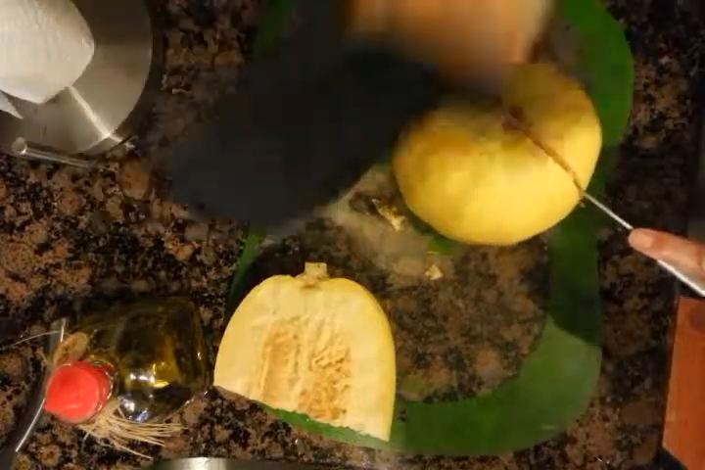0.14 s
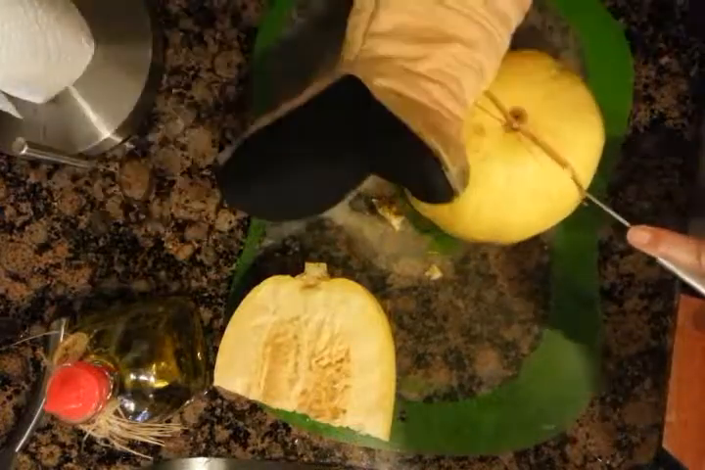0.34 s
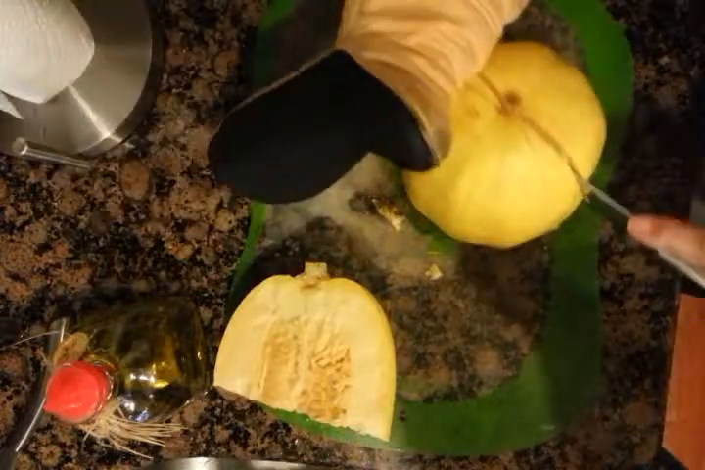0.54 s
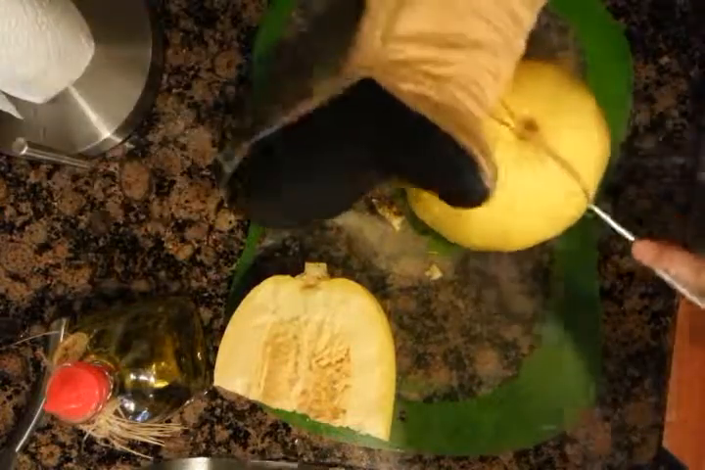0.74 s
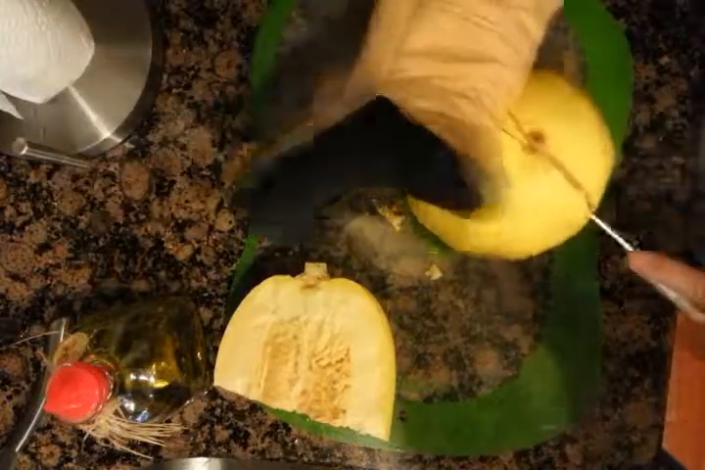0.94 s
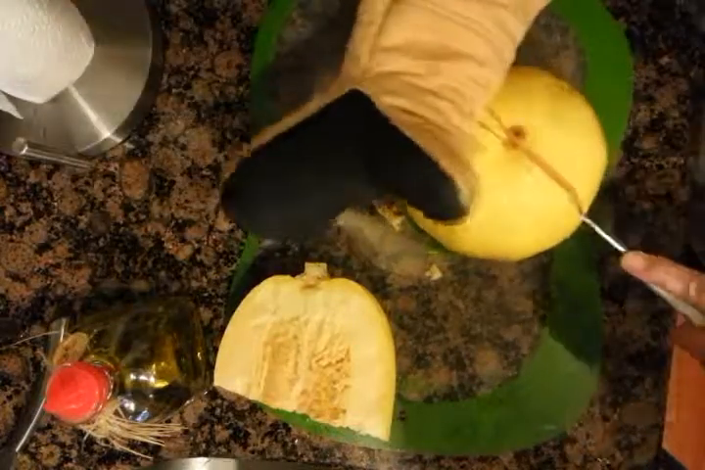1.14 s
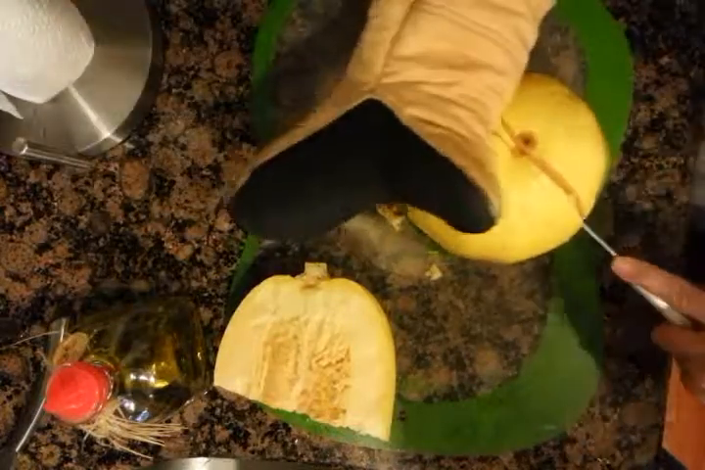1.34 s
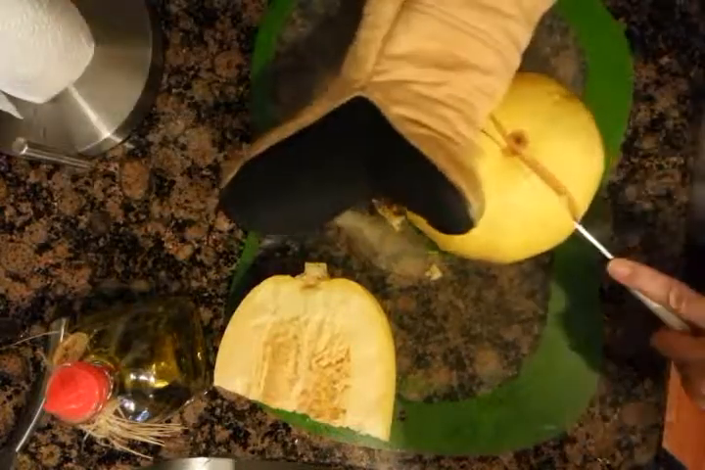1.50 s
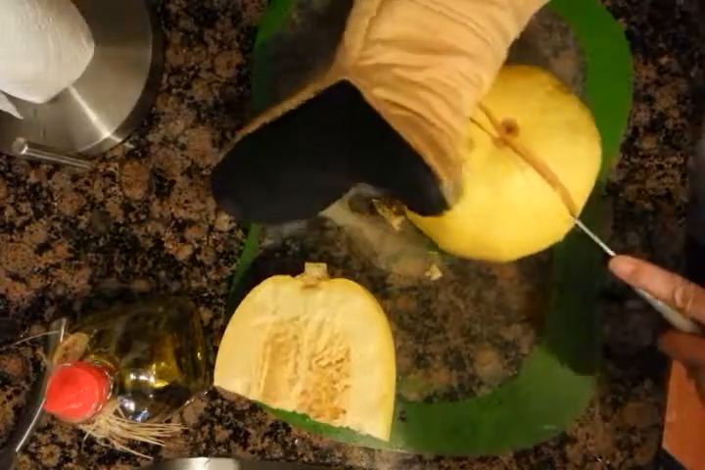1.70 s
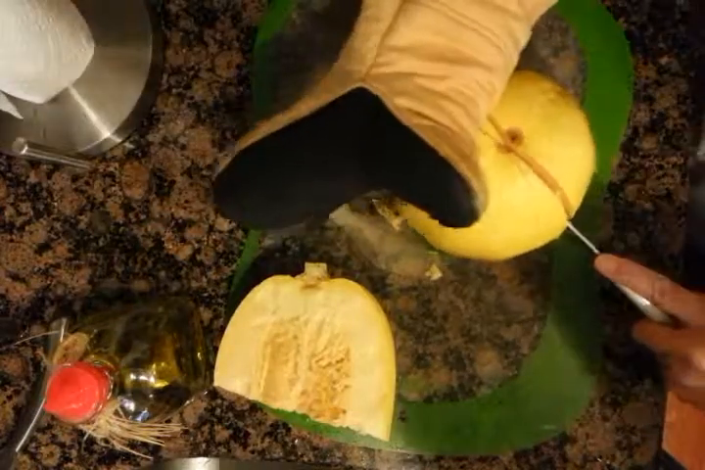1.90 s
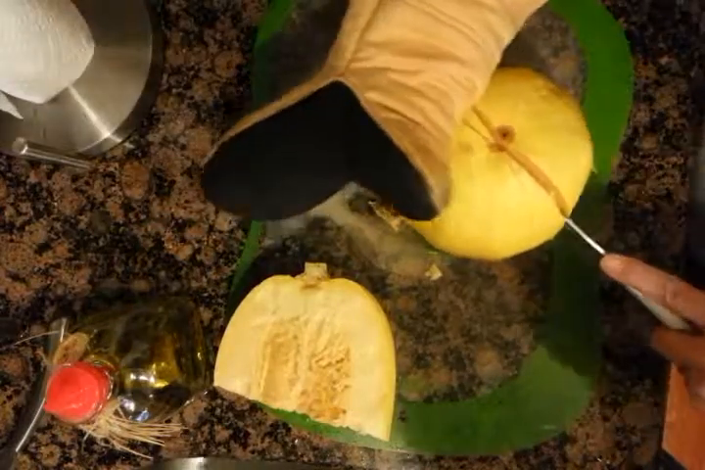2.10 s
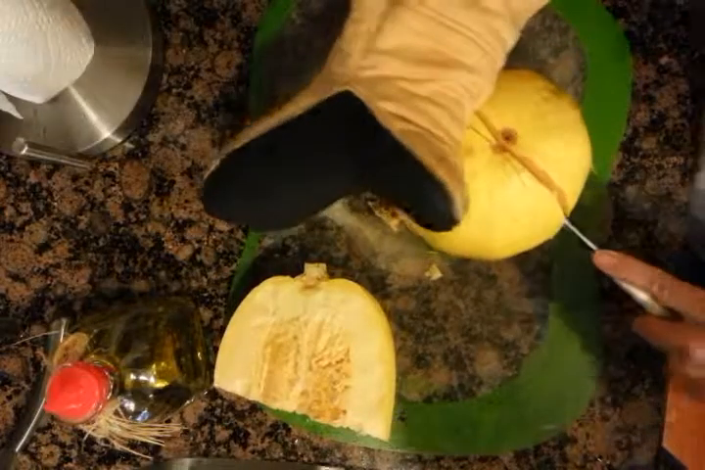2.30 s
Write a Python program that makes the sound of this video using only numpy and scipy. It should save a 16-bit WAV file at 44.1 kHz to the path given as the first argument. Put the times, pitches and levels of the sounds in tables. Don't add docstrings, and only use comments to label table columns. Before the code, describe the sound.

A knife works through a hard squash on a thin board, opening with a deep hollow thump, then lighter knocks, gritty tearing, crunches and snaps, with blade scrapes between strokes, heard close in a quiet kitchen.

```python
import sys
import numpy as np
from scipy import signal
from scipy.fft import rfft, irfft
from scipy.io import wavfile
from scipy.ndimage import uniform_filter1d

SR = 44100
rng = np.random.default_rng(int(sys.argv[2]) if len(sys.argv) > 2 else 0)


def wav_record(signal):
    frames = np.transpose(np.atleast_2d(signal))
    bounded = np.clip(frames, -1, 1)
    quanta = np.round(bounded * 32767).astype(np.int16)
    wavfile.write(sys.argv[1], SR, quanta)


def voltage_ratio(level):
    return 10 ** (np.asarray(level, float) / 20)


N = 103635
T = np.arange(N) / SR

# start_s, boom_db, board_ring_db, knock_db, ring_t60_s
LANDINGS = [
    (0.24, -2, -6, -28, 0.37),
    (0.303, -26, -21, -30, 0.26),
    (.651, -15.5, -8, -11.5, 0.2),
    (0.9856, -21.5, -9.5, -12, 0.26),
    (1.312, -22.5, -9.5, -11, 0.35),
    (1.872, -23.5, -10.5, -21.5, 0.12),
    (1.903, -53, -26.5, -42, 0.55),
    (2.134, -56, -39, -42, 0.2),
    (2.2947, -19, -23.5, -41, 0.38),
]
# pitch_hz, level_db, left_over_right_db, share_of_t60, signed_gain
BOARD_MODES = [(181.2, -0.5, 7, 1.0, 0.82), (216, -7.5, 13, 0.41, -1.22)]
# pitch_hz, level_db, t60_s, left_over_right_db
KNOCK_MODES = [(256, -14.5, 0.0078, -8), (417.6, 0.5, 0.031, -11.5), (600, 2, 0.014, 2),
               (825, -42, 0.16, 26)]
# start_s, rise_s, level_db, fall_t60_s, body_share_db
SCRAPES = [(.234, 0.0023, -21, 0.13, 9.5), (.265, 0.0064, -40, 1, 7), (.652, 0.022, -30.5, 0.22, -6),
           (.68, 0.0028, -19.5, 0.088, -14), (.697, 0.032, -36, 0.037, -2), (.72, 0.028, -51.5, 1, 11.5),
           (.988, 0.00067, -42.5, 0.6, 5), (1.001, 0.0043, -31.5, 0.3, 2), (1.019, 0.0087, -34.5, 0.22, 3),
           (1.328, 0.03, -25.5, 0.31, -12), (1.36, 0.011, -24.5, 0.18, -3.5),
           (1.41, 0.0053, -41.5, 0.51, 12.5), (1.868, 0.0026, -33, 0.42, 9), (1.9, 0.0044, -28.5, 0.24, 7.5),
           (2.272, 0.023, -39.5, 0.38, 5),
           (0, 0.037, -79, 1.1, 29), (0.138, 0.023, -57.5, 1, 6.5), (.395, .004, -58, 0.25, -8),
          (.955, 0.023, -55.5, 0.37, 3), (0.341, 0.079, -37, 0.37, 5.5), (0.526, 0.017, -33.5, 0.14, 11),
          (0.807, 0.004, -35.5, 0.11, -4), (.9, 0.048, -60.5, 0.9, -7), (1.096, 0.023, -28.5, 0.16, 9.5),
          (1.116, 0.013, -28.5, 0.13, 12.5), (1.216, 0.0043, -30.5, 0.64, 8.5), (1.27, .03, -35.5, 0.38, 8),
          (1.452, 0.076, -43.5, 0.17, 0), (1.681, 0.0021, -56.5, 0.49, 1), (1.747, 0.0021, -33.5, 0.071, 3),
          (1.775, 0.014, -40.5, 0.33, 3), (1.821, 0.0043, -41, 0.85, 8.5), (2.029, 0.026, -33, 0.28, 9),
          (2.053, 0.024, -29.5, 0.11, 7), (2.12, 0.02, -49.5, 1.6, 6.5), (2.188, 0.05, -42.5, 0.56, 0.5)]
# start_s, peak_db
SNAPS = [(.1757, -41), (.6562, -24), (.8078, -21), (.9211, -38), (.962, -36), (.9894, -23), (1.1106, -20),
         (1.3406, -11), (1.4105, -17), (1.6893, -40), (1.7462, -19), (1.7931, -30), (1.8719, -19),
         (2.0724, -17), (2.2151, -34), (2.2495, -26), (2.285, -19), (0.2409, -6), (0.2688, -17),
         (0.3491, -25), (0.3671, -23), (0.3997, -14), (1.0375, -17), (1.0475, -17), (1.0585, -20),
         (1.2555, -17), (0.5242, -22), (0.6664, -13), (0.6833, -9), (0.6994, -9), (0.7034, -9),
         (1.0021, -18), (1.0203, -4), (1.1209, -14), (1.2261, -19), (1.3329, -11), (1.3454, -10),
         (1.3668, -8), (1.3744, -6), (1.3864, -10), (1.3944, -10), (1.4496, -23), (1.8223, -21),
         (1.9068, -2), (1.954, -16), (2.0248, -23), (2.0487, -19), (2.139, -29), (2.2807, -19)]
# start_s, rise_s, level_db, fall_t60_s
CRUNCHES = [(0.233, 0.0069, -27, 0.26), (0.302, 0.02, -46, 0.85), (.655, 0.0042, -36.5, 0.16),
            (0.682, 0.0037, -31.5, 0.19), (0.7, 0.011, -33.5, 0.084), (.5, .03, -52.5, 0.71),
            (.78, 0.0084, -51, 0.38), (0.988, 0.003, -31.5, 0.15), (1.317, 0.0073, -33.5, 0.67),
            (.88, 0.015, -49, 0.55), (1.017, 0.0065, -33.5, 0.22), (1.22, 0.097, -42, 1),
            (1.357, 0.014, -26, 0.13), (1.385, 0.0066, -30, 0.092), (1.42, 0.021, -50.5, 0.17),
            (1.682, 0.0032, -46.5, 0.26), (1.829, 0.017, -43, 1), (1.899, 0.011, -32.5, 0.1),
            (2.13, 0.008, -54.5, 1), (2.256, 0.037, -39, 0.26)]
# pitch_hz, width_hz, level_db, left_over_right_db
FLESH = [(390.5, 117, -1.5, -11.5), (446.5, 78.5, 5, 0), (653, 177, 2.5, 0), (768.7, 76, -0.5, 10),
         (1030, 320, -6, 12.5)]
# pitch_hz, width_hz, level_db
SHELL_BODY = [(1062, 290, -10.5), (1623, 208, -7.5), (1770, 150, -9), (2074, 810, -6.5)]
# pitch_hz, level_db_per_hz
GRIT = [(900, -33), (1600, -11), (3500, -10), (4900, -6.5), (5700, -6.5), (6900, 3), (8800, -9),
        (14500, -17)]
# pitch_hz, left_over_right_db
LEAN = [(60, -6), (110, -8), (200, 1), (380, -12), (700, 3), (1290, 4), (2380, 1.5), (4400, 2),
        (8120, -15.5), (15000, -8.5)]
# pitch_hz, width_hz, level_db
PATCHES = [(hz, hz / 6, 0) for hz in 2700 * 1.25 ** np.arange(7)]
# start_s, pitch_hz, level_db, t60_s
CRACKS = [(0.239, 563, -20, 0.065), (.241, 724, -21, 0.093), (.372, 445, -37.5, 0.11),
          (.683, 400, -23, 0.039), (.684, 643, -25.5, 0.029), (.71, 756, -26, 0.047),
          (0.969, 600, -39.5, 0.13), (1.016, 635, -25, 0.025), (1.02, 1033, -33, 0.047),
          (1.295, 600, -31, 0.12), (1.365, 600, -18, 0.064), (1.368, 376, -17.5, 0.088),
          (1.368, 1003, -26.5, 0.091), (1.371, 762, -19.5, .06), (1.386, 762, -18.5, 0.075),
          (1.685, 444, -35.5, .12), (1.836, 581, -39, 0.042), (2.138, 585, -34, 0.049)]
RING_STARTS = [.8085, 1.7475, 1.794, .54, 1.135, .235, .921]
# pitch_hz, level_db, t60_s, left_over_right_db
RING_MODES = [
    [(1605, -34, .15, 6), (5075, -23, .09, 4), (5030, -40, .25, 2), (6225, -26, .09, -6),
     (6190, -37, .25, -8)],
    [(1518, -38, .08, 5), (2300, -33, .04, 3)],
    [(1520, -36, .13, 5)],
    [(1555, -33, .08, 5)],
    [(1600, -33, .08, 5)],
    [(1030, -20, .1, 5)],
    [(5075, -55, .1, 3)],
]
# pitch_hz, level_db_per_hz
HUM = [(18, -46), (30, -16), (216, -13.5), (355, -12), (1060, -19.5), (1300, -24), (2900, -27),
       (14000, -38.5)]
REST_TIMES = [1.55, 1.601, 1.669, 1.683]

BOOM_HZ, BOOM_T60_S, PUSH_S = 105, .15, 0.0017
SWELL_S, HOLD_S, STILL_DB = 0.0058, 0.064, -9
ROCK_DB = 7.5
SNAP_T60_S, SNAP_DB = .009, -4.5
GRAIN_PER_S, GRAIN_DB, ROUGH_DB, CRACKLE_DB = 4000, 2.2, 1.5, 2.5
PATCH_DB, PATCHY_DB = -16, 3.5
BODY_DB, LEFT_LAG_S = -7, .0019
RING_RUB_S = 0.009
HUM_DB, RUMBLE_DB = -56.5, -55.5
AFTER_DB, AFTER_T60_S, SHUDDER_WALK_DB = -21.5, 0.49, 2.5
ROOM_T60_S, ROOM_DB = .25, -13
REST_DB, TOP_HZ = -4.5, 14600


def unit(x):
    return x / np.sqrt(np.mean(x ** 2))


def curve(points, hz):
    p = np.array(points, float)
    return np.interp(np.log(hz + 1), np.log(p[:, 0] + 1), p[:, 1])


def colour(x, db_of_hz):
    response = voltage_ratio(db_of_hz(np.fft.rfftfreq(2048, 1 / SR)))
    cepstrum = np.fft.irfft(np.log(response))
    cepstrum[1:1024] *= 2
    cepstrum[1025:] = 0
    return signal.fftconvolve(x, irfft(np.exp(rfft(cepstrum))))[:N]


def mode(x, hz, t60):
    pole = np.exp(2j * np.pi * hz / SR - np.log(1000) / (max(t60, .005) * SR))
    return signal.lfilter([1], [1, -pole], x).imag


def walk(rate):
    k = int(SR / rate)
    steps = np.repeat(rng.standard_normal(N // k + 1), k)
    return unit(uniform_filter1d(steps, k)[:N])


def bands(x, table, patchy_db=0.):
    total = 0
    for hz, width, db in table:
        level = voltage_ratio(db + patchy_db * walk(25.16))
        t60 = 2.82 / width
        total = total + level * unit(mode(mode(x, hz, t60), hz, t60))
    return total


def pan(db):
    return voltage_ratio(np.array([[db], [-db]]) / 2)


def swell(s, rise, db, t60):
    u = np.clip(T - s, 0, 9)
    rise = max(rise, .0005)
    fall = np.exp(-np.log(1000) * np.maximum(u - rise, 0) / max(t60, .01))
    return voltage_ratio(db) * np.minimum(u / rise, 1) ** 1.5 * fall


def push(s, width):
    u = (T - s) / max(width, 2 / SR)
    x = np.sin(np.pi * np.clip(u, 0, 1)) ** 2
    return x / x.sum()


def thumps():
    out = np.zeros((2, N))
    for s, boom_db, ring_db, knock_db, t60 in LANDINGS:
        hit, slow = push(s, PUSH_S), push(s, SWELL_S)
        still = voltage_ratio(STILL_DB * np.clip((T - s - HOLD_S) / 0.017, 0, 1))
        rocking = np.clip((T - s - HOLD_S) / 0.029, 0, 1)
        rock = voltage_ratio(ROCK_DB * np.array([walk(43.6), walk(45)]) * rocking)
        out += voltage_ratio(boom_db) * mode(slow, BOOM_HZ, BOOM_T60_S) * rock[0]
        grow = 1 - np.exp(-np.clip(T - s, 0, 9) / SWELL_S)
        for hz, db, lr_db, share, sign in BOARD_MODES:
            ring = mode(hit, hz, t60 * share) * grow * still * rock[1]
            out += pan(lr_db) * sign * voltage_ratio(ring_db + db) * ring
        for hz, db, knock_t60, lr_db in KNOCK_MODES:
            out -= pan(lr_db) * voltage_ratio(knock_db + db) * mode(hit, hz, knock_t60)
    return out


def grains():
    size = voltage_ratio(GRAIN_DB * np.minimum(rng.exponential(size=N), 5))
    clicks = (rng.random(N) < GRAIN_PER_S / SR) * size
    held = signal.lfilter([1], [1, -.93], clicks)
    return unit(0.45 + held) * voltage_ratio(ROUGH_DB * walk(96))


def rind():
    rows = SCRAPES
    grit = np.sqrt(sum(swell(s, r, db, t) ** 2 for s, r, db, t, _ in rows))
    body = np.sqrt(sum(swell(s, r, db + b + BODY_DB, t) ** 2 for s, r, db, t, b in rows))
    snaps = sum(swell(s, 0.00034, db + SNAP_DB, SNAP_T60_S) for s, db in SNAPS)
    crunch = voltage_ratio(CRACKLE_DB * walk(140)) * np.sqrt(sum(swell(*row) ** 2 for row in CRUNCHES))
    stick_slip = grains()
    shared = rng.standard_normal(N)
    out = []
    for side in (1, -1):
        def port_colour(hz):
            port_share_db = -10 * np.log10(1 + voltage_ratio(-2 * side * curve(LEAN, hz)))
            return curve(GRIT, hz) + port_share_db - 30 * (hz < 800)

        noise = rng.standard_normal(N)
        patches = voltage_ratio(PATCH_DB) * bands(rng.standard_normal(N), PATCHES, PATCHY_DB)
        norm = np.std(colour(noise, lambda hz: curve(GRIT, hz)))
        tearing = (noise + patches) * stick_slip * grit + np.sign(noise) * snaps
        y = 2 * colour(tearing, port_colour) / norm
        y = y + body * voltage_ratio(3.8 * side) * bands(rng.standard_normal(N) * stick_slip, SHELL_BODY, 2.26)
        y = np.roll(y, int(LEFT_LAG_S * SR) * (side > 0))
        flesh = [(hz, width, db + side * lr_db / 2) for hz, width, db, lr_db in FLESH]
        y = y + crunch * 0.64 * bands((shared + 1.14 * noise) * stick_slip, flesh)
        out.append(y)
    return np.array(out)


def shell():
    out = np.zeros((2, N))
    lean = np.array(FLESH)[:, ::3]
    for s, hz, db, t60 in CRACKS:
        jolt = rng.standard_normal(N) * swell(s, .002, 0, 0.013)
        ring = mode(jolt, hz, t60)
        out += pan(curve(lean, hz)) * voltage_ratio(db) * ring / np.abs(ring).max()
    return out


def blade():
    out = np.zeros((2, N))
    for s, modes in zip(RING_STARTS, RING_MODES):
        rub = rng.standard_normal(N) * swell(s, 0.0018, 0, RING_RUB_S)
        for hz, db, t60, lr_db in modes:
            ring = mode(rub, hz, t60)
            out += pan(lr_db) * voltage_ratio(db) * ring / np.abs(ring).max()
    return out


def room(x):
    t = T[:SR // 2]
    tail = rng.standard_normal((2, len(t))) * voltage_ratio(-60 * t / ROOM_T60_S) * (t > .003)
    tail = tail / np.sqrt(np.sum(tail ** 2, axis=1, keepdims=True))
    return voltage_ratio(ROOM_DB) * signal.fftconvolve(x, tail, axes=1)[:, :N]


def kitchen():
    mid, left, right = rng.standard_normal((3, N))
    low = colour(mid, lambda hz: curve(HUM, hz) - 40 * (hz > 260))
    high = [colour(v, lambda hz: curve(HUM, hz) + 3 - 40 * (hz <= 260)) for v in (left, right)]
    hum = low + np.array(high)
    shudder = bands(rng.standard_normal(N), [(116.5, 46, 0), (173.3, 38, -0.5), (224.7, 46, -3.5)])
    after = sum(swell(row[0], 0.0053, row[2] + AFTER_DB, AFTER_T60_S) for row in LANDINGS)
    work = voltage_ratio(RUMBLE_DB) + after
    return voltage_ratio(HUM_DB) * unit(hum) + voltage_ratio(SHUDDER_WALK_DB * walk(22.74)) * shudder * work


def scene():
    rest = voltage_ratio(np.interp(T, REST_TIMES, [0, REST_DB, REST_DB, 0]))
    near = rind() + blade() + shell()
    return rest * (near + room(near) + kitchen()) + thumps()


def low_pass(x):
    return signal.sosfilt(signal.butter(12, 15710, fs=SR, output="sos"), x)


def record(dry):
    x = signal.sosfilt(signal.butter(3, 70, "high", fs=SR, output="sos"), dry)
    x = signal.sosfilt(signal.ellip(6, .5, 32, TOP_HZ, fs=SR, output="sos"), x)
    mix = np.tanh(x)
    return low_pass(mix)


dry = scene()
out = record(dry)
wav_record(out)
```